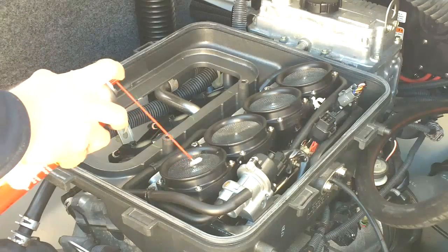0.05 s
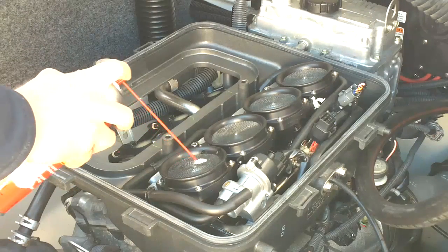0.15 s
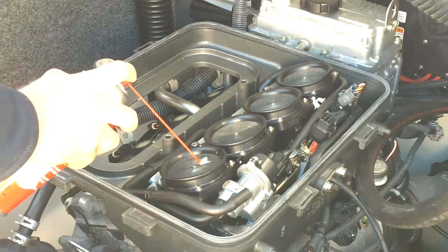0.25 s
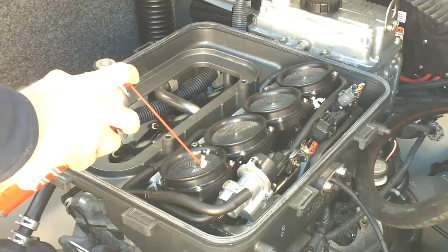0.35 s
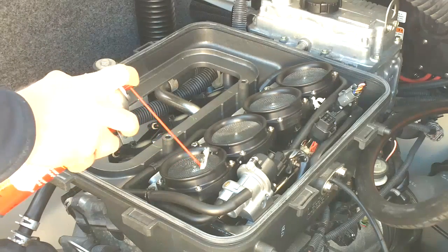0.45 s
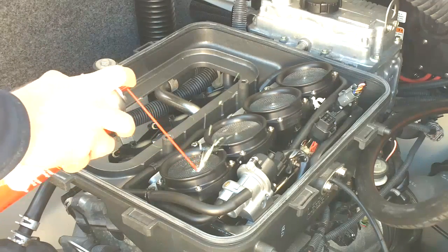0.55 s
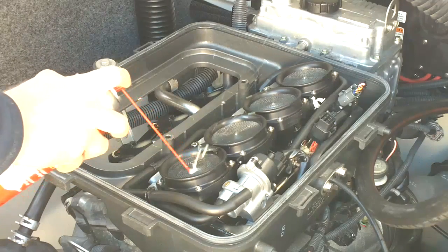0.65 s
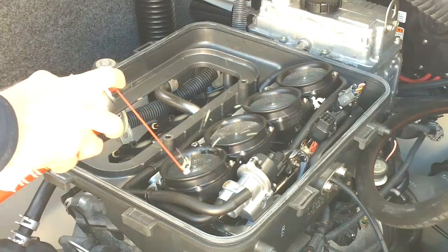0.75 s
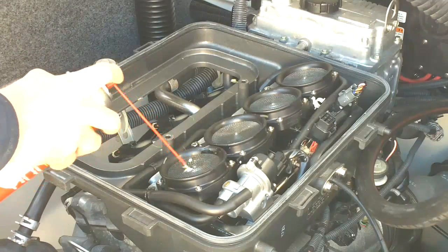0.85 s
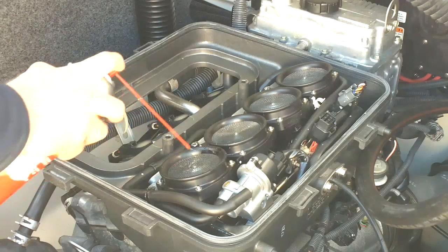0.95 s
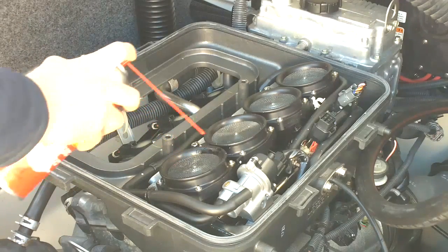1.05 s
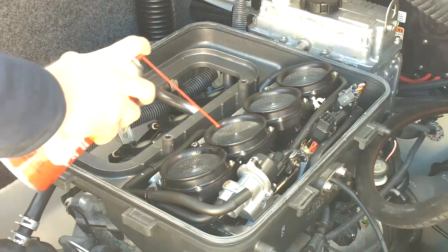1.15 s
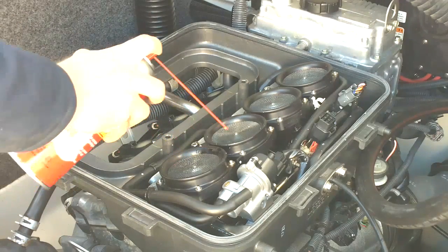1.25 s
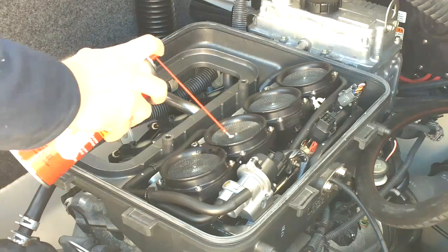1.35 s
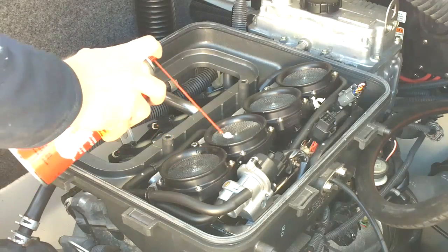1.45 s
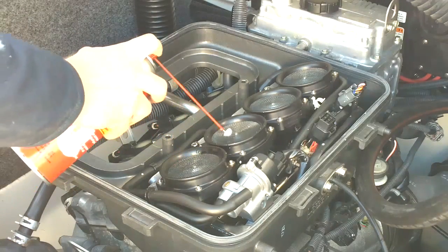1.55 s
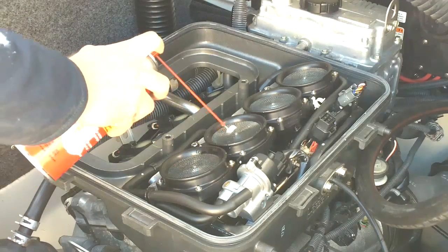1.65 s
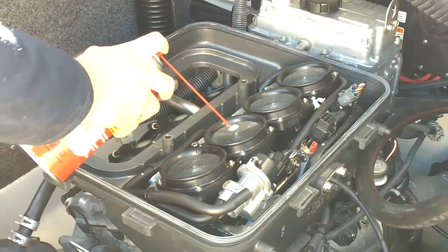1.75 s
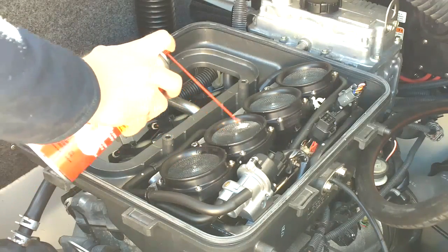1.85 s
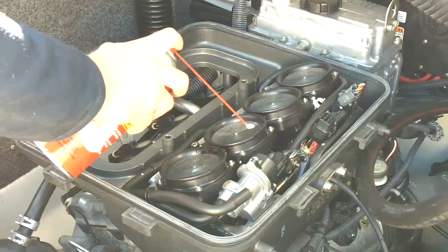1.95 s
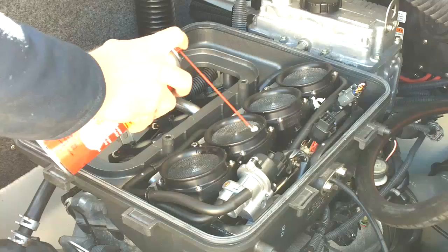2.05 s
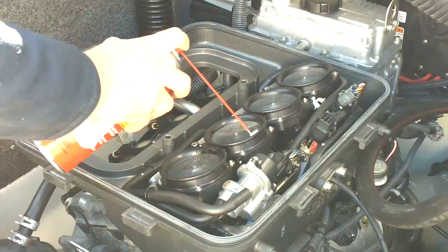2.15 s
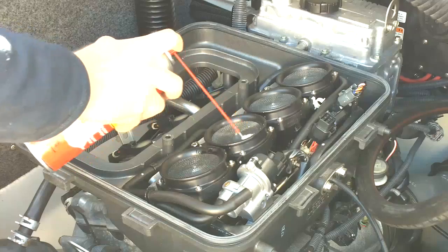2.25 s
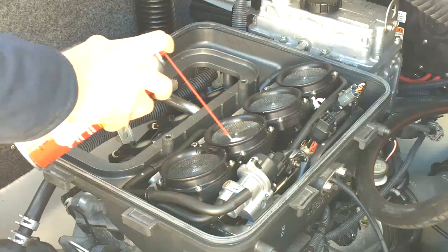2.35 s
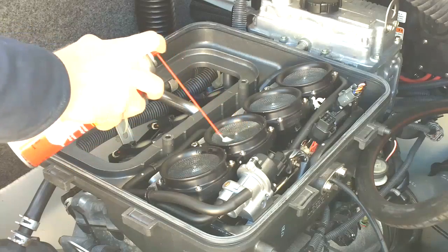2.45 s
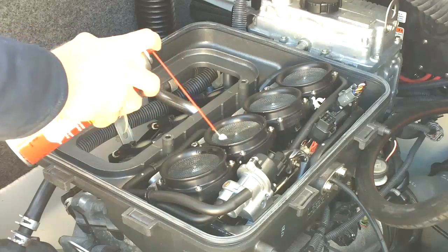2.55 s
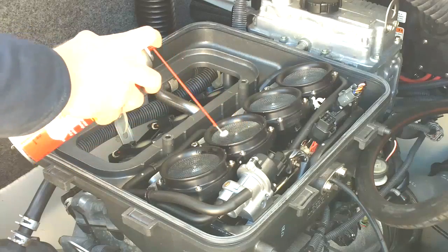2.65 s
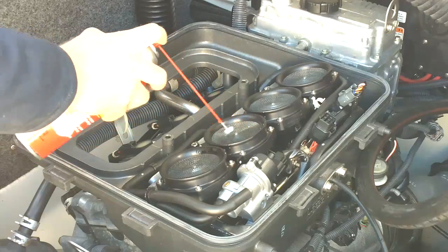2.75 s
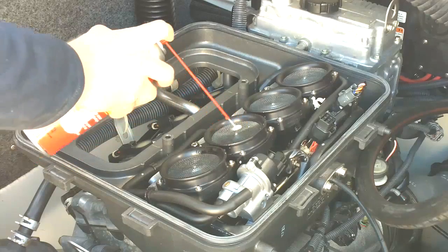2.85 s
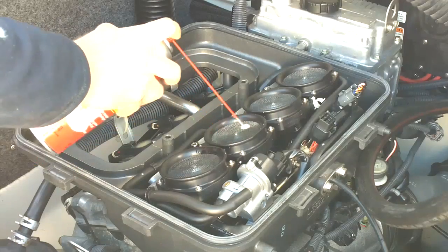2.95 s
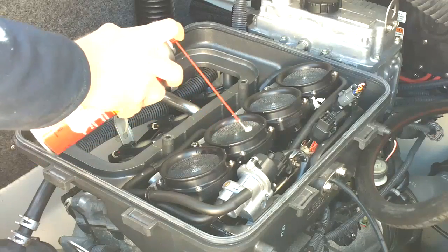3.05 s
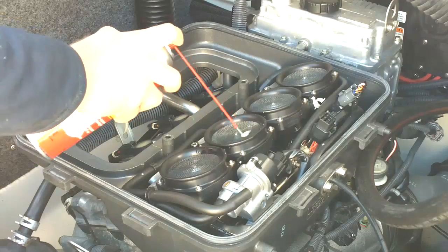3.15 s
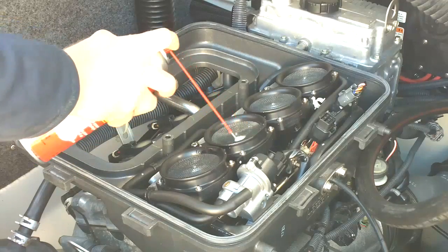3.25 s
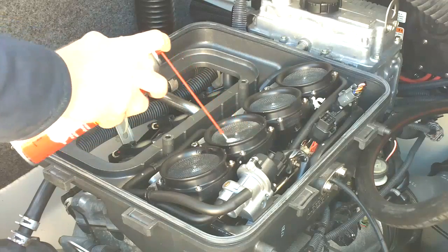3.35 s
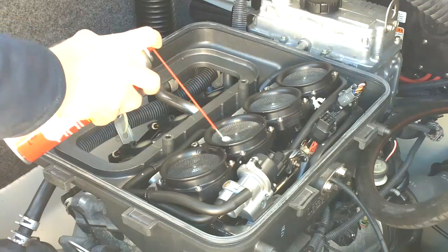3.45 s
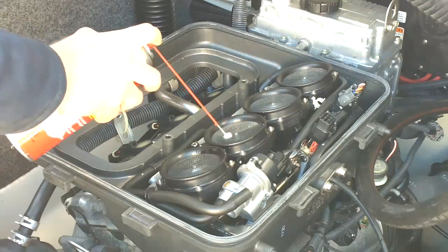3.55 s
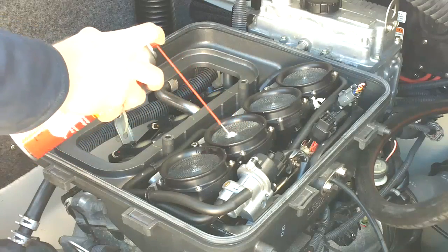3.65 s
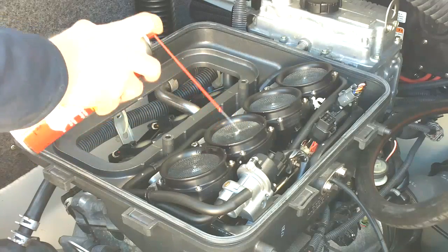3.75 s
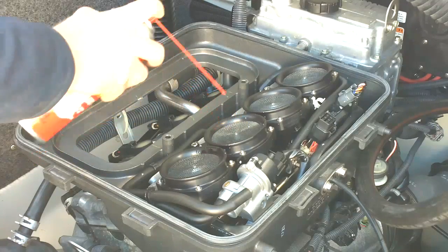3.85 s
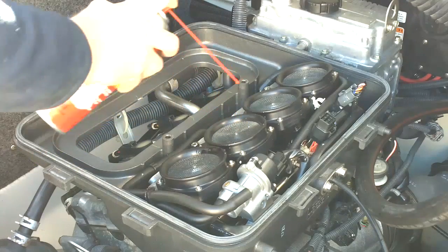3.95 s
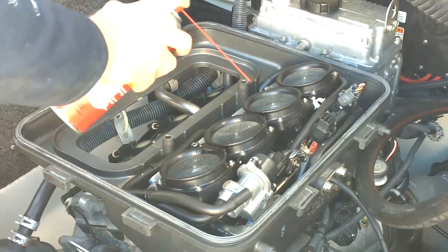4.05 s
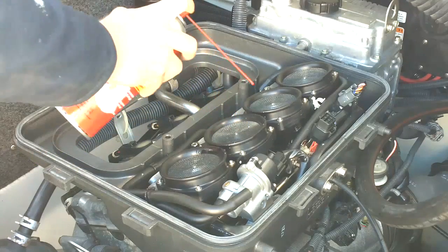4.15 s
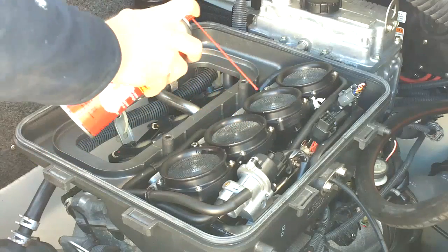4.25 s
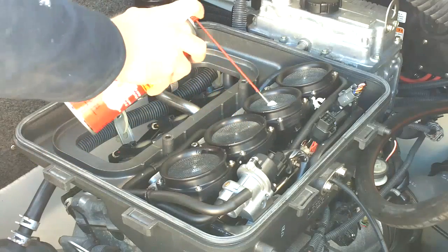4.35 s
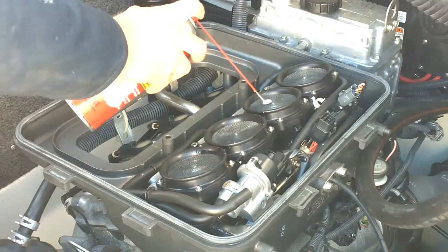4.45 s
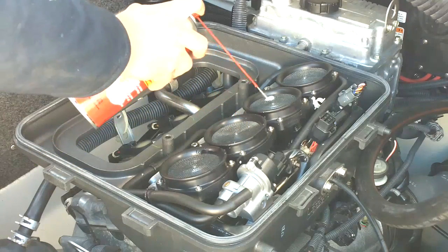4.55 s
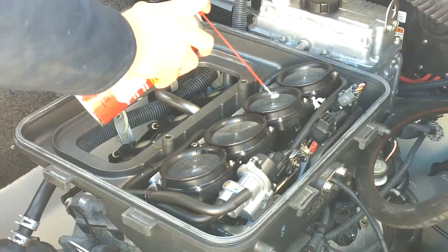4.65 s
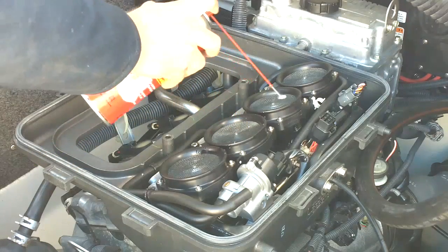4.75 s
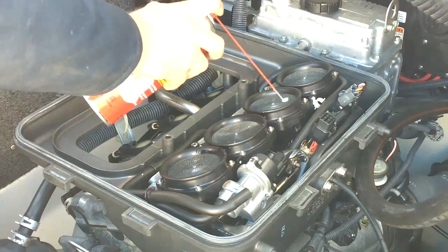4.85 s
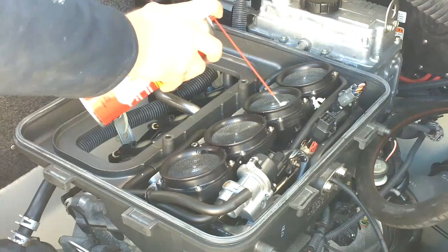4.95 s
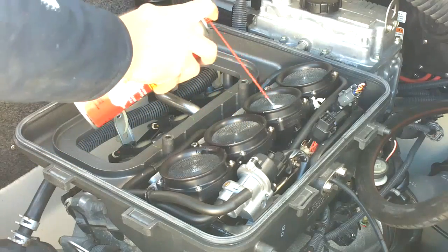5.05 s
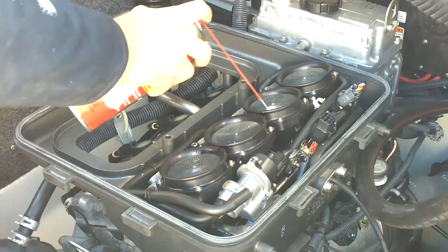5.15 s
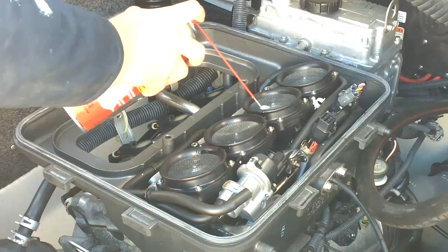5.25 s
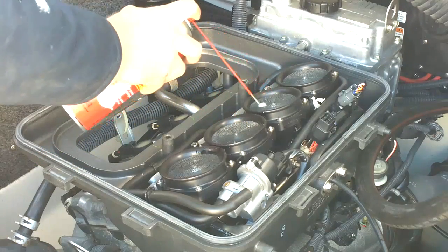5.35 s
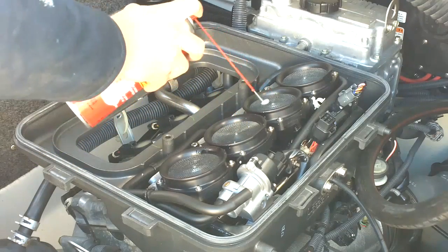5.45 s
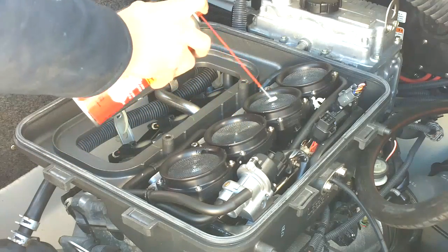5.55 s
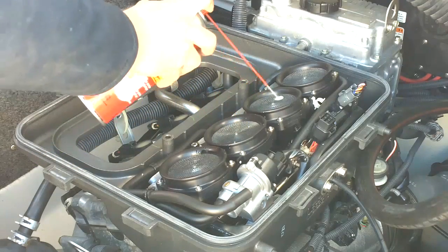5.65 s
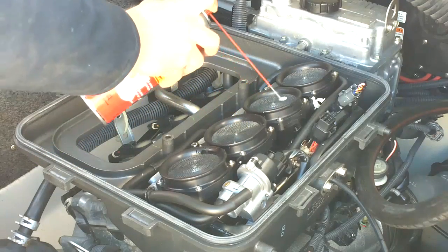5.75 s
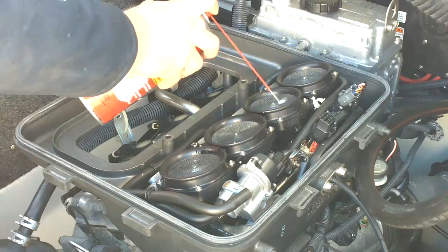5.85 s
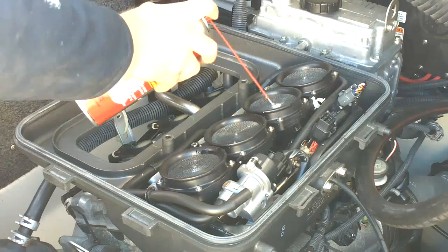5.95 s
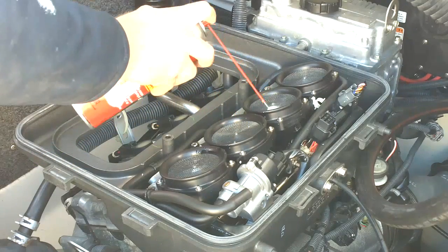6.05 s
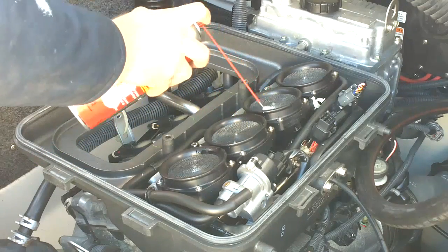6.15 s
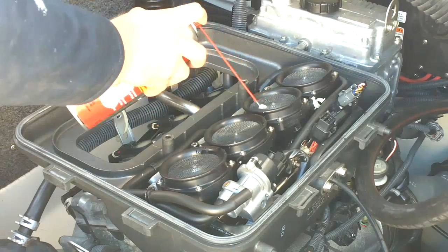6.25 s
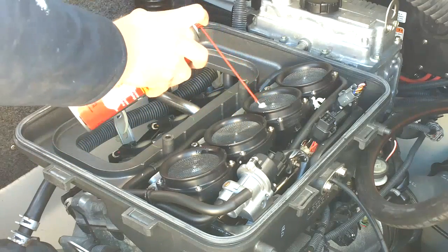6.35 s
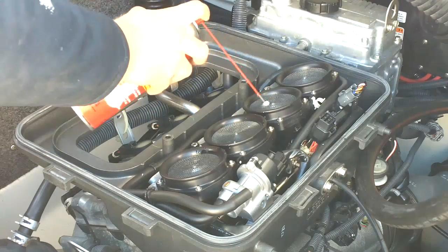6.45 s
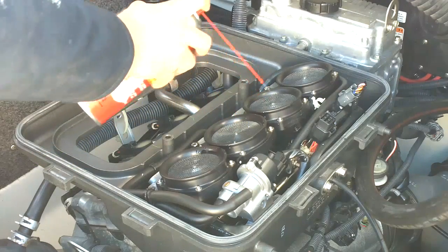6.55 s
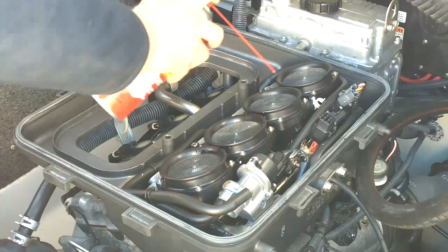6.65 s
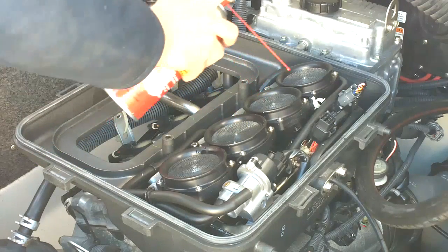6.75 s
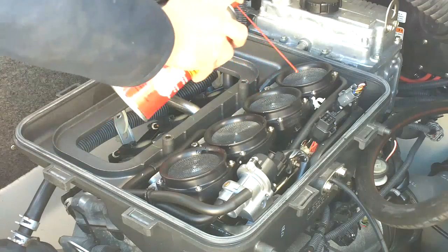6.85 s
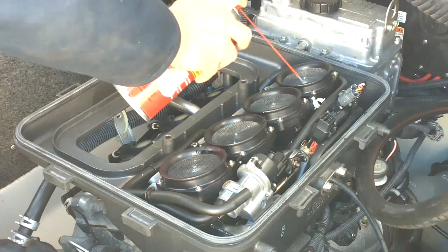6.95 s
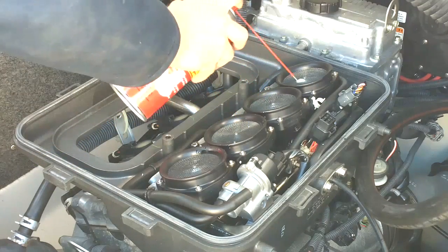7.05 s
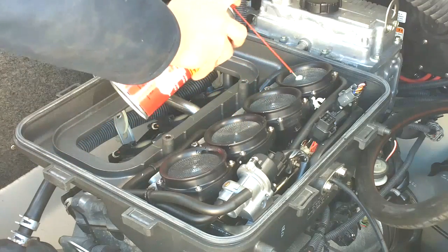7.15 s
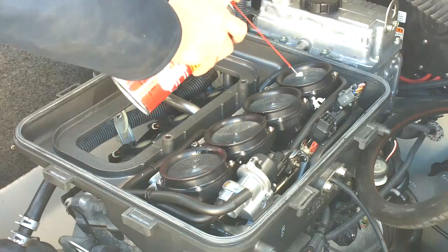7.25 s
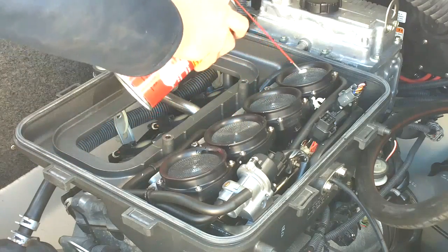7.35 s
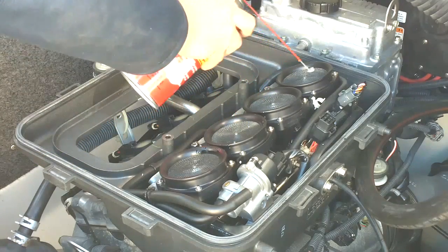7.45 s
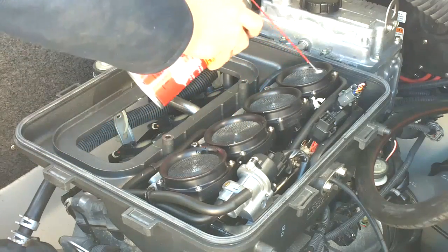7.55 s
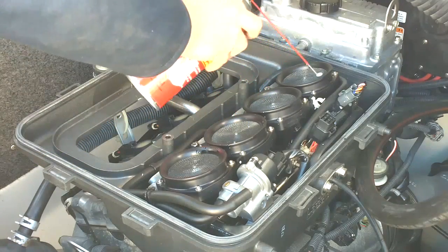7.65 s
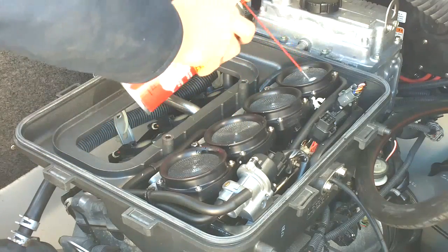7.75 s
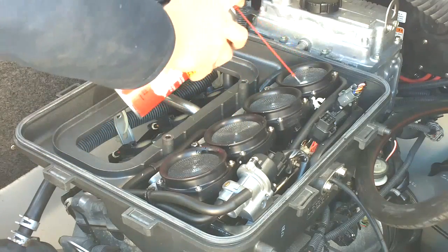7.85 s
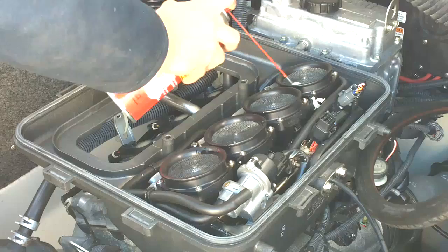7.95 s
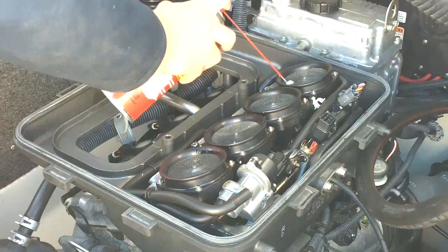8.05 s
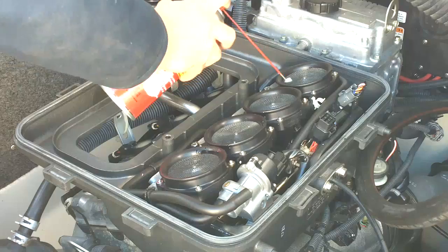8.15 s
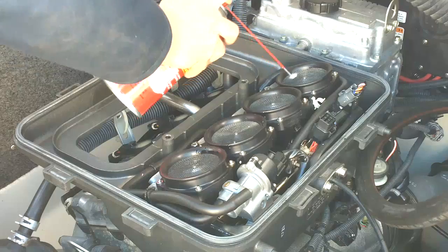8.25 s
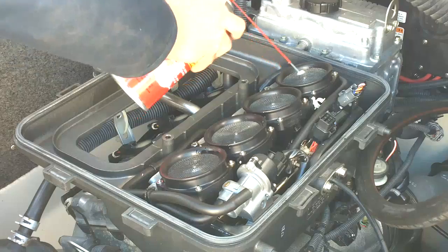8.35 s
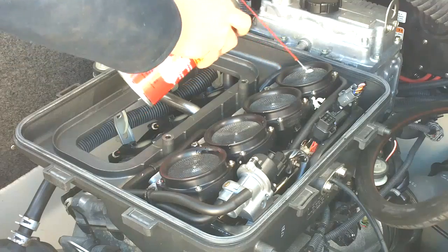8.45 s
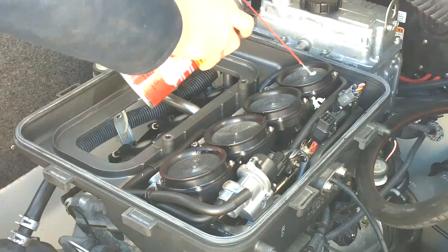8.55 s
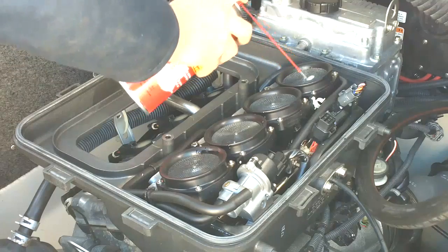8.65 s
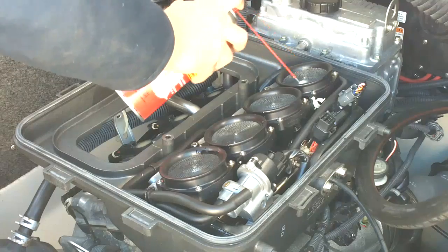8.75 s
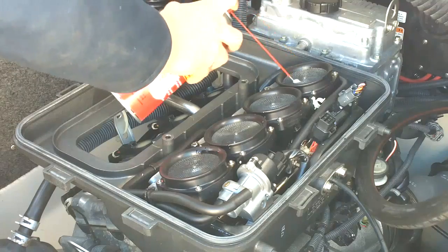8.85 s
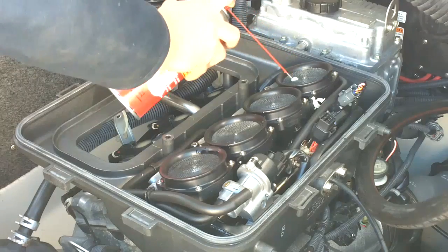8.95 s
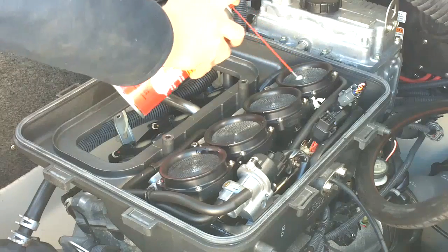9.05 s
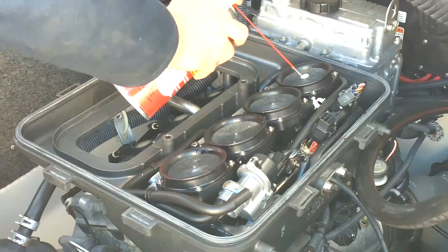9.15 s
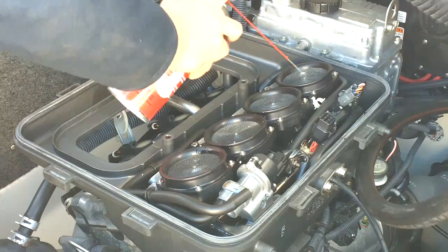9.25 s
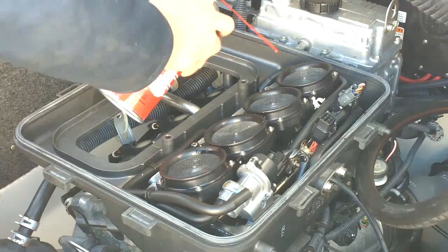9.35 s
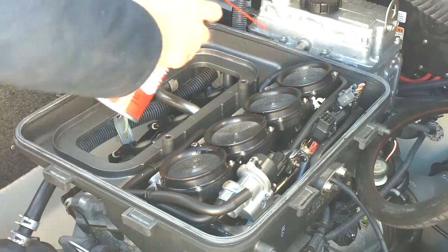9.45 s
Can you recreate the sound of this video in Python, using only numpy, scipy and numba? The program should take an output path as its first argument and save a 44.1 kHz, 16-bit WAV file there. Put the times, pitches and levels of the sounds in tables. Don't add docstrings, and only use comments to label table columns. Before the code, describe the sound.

In a quiet workshop, oil is sprayed through a straw into four engine bores in turn. Each spray starts with a sudden puff of gas, turns into splashy, grainy hiss with a shifting tubular resonance, then stops abruptly with a tiny leaking fizz. Soft dull taps and deep wind-like thumps intrude on the small, close microphone, its treble somewhat dulled.

```python
import sys
import numpy as np
from scipy import signal
from scipy.fft import rfft, irfft
from scipy.io import wavfile
from scipy.ndimage import uniform_filter1d
from numba import njit

SR = 44100
rng = np.random.default_rng(int(sys.argv[2]) if len(sys.argv) > 2 else 0)


def invert_db(level):
    return 10 ** (np.asarray(level, dtype=float) / 20)


def materialize(psi):
    bounded = np.clip(np.atleast_2d(psi).T, -1, 1)
    quanta = np.round(bounded * 32767).astype(np.int16)
    wavfile.write(sys.argv[1], SR, quanta)


N = 418950

# (frequency [Hz], density [dB per Hz])
AIR_SPECTRUM = [(150, 6), (300, 0), (550, -0.5), (1000, -7.5), (2000, -11.5), (3500, -14.5), (4800, -15),
                (5600, -9.5), (7000, -10.5), (10500, -17), (15000, -19.5)]
AIR_DB = -60

# (time [s], peak [dB], frequency [Hz], width [Hz], t60 [s])
KNOCKS = [(1.79, -44.5, 515, 200, 0.25), (1.85, -49, 550, 200, 0.21), (4.081, -55, 3550, 900, .15),
          (4.08, -56, 4500, 6000, .4), (6.74, -64, 700, 1500, .03), (6.781, -53.5, 600, 1380, 0.075),
          (7.39, -45, 560, 300, 0.05), (9.351, -48, 650, 600, 0.044)]

# (time [s], fade [s], slow heave [dB], rumble [dB])
GUSTS = [(0.42, .06, -50, -50.5), (1.56, .06, -43.5, -69), (1.75, 0.076, -53, -51), (2.7, 0.058, -51, -62),
         (4.13, 0.14, -34, -47), (4.47, 0.15, -59, -46), (4.6, 0.11, -32.5, -58),
         (4.76, 0.13, -32.5, -38.5), (5.16, 0.065, -31, -40), (5.48, 0.22, -42, -51),
         (6.0, 0.096, -41, -45), (6.27, 0.23, -40, -50), (6.46, 0.034, -43, -72),
         (6.96, 0.16, -38.5, -45.5), (7.06, 0.029, -33, -38), (7.7, 0.48, -44.5, -60),
         (7.86, 0.07, -26.5, -36), (8.02, 0.09, -28.5, -35), (8.33, 0.029, -17.5, -50),
         (8.37, 0.12, -28.5, -35), (8.71, 0.13, -38, -52), (8.91, 0.2, -41.5, -63), (9.28, .08, -45, -45.5)]
GUST_RISE_PER_FADE = 0.61
CALM_HEAVE_DB, CALM_RUMBLE_DB, CALM_SWING_DB = -58.5, -54, 3.0
LUMPS_DB, LUMPS_HZ = 2.5, 11.7
# (time [s], peak [dB], swing [Hz], flutter [dB])
PUFFS = [(4.211, -21.5, 65.7, -40), (4.462, -48, 152, -35), (4.521, -21, 162, -29), (4.568, -26, 96, -37),
         (4.588, -24, 188, -28.5), (4.61, -24, 51, -37), (4.695, -21.5, 58.6, -34), (4.765, -23, 95, -24.5),
         (4.795, -38, 120, -31.5), (4.897, -20, 74, -37), (4.944, -24, 80, -38), (6.219, -19, 78, -37),
         (6.274, -28.5, 156, -29.5), (6.786, -33, 64, -41), (6.924, -19.5, 68.4, -39),
         (6.948, -27, 48, -38), (7.057, -23.5, 107, -35), (7.391, -49, 108, -38), (7.86, -15.5, 72.6, -28),
         (7.949, -13, 186, -20.5), (8.002, -18.5, 108, -22), (8.044, -30, 99, -40),
         (8.321, -28, 146, -20.5), (8.35, -11, 44, -23), (8.368, -8.5, 80.5, -24), (8.443, -32, 111, -34.5),
         (8.476, -26.5, 153, -31.5), (8.694, -32, 28, -29), (8.72, -29, 40, -32), (8.771, -22, 103, -51)]

# (valve pressed [s], let go [s], nozzle hiss [dB], splash [dB], deep bore tone [dB])
SPRAYS = [
    (-0.3, 0.86, -44.5, -42, -48.5),
    (1.325, 3.74, -46, -40.5, -52.5),
    (4.25, 6.48, -45.5, -39.5, -49.5),
    (6.92, 9.27, -45.5, -40, -51),
]
# (time after press [s], hiss [dB], splash [dB], rings [dB])
OPENING = [
    (0.0, -55, -53, -50),
    (0.011, -36, -34, -42),
    (0.017, -9, -14.5, -46),
    (0.06, 0, -6.5, -19),
    (0.078, -2, 2.5, -1),
    (0.1, 0, 0, 0),
]
# (time after release [s], hiss [dB], splash [dB], rings [dB])
CLOSING = [
    (0.0, -0.5, 0, 0),
    (0.02, -2, -6.5, -14),
    (0.07, -4, -13.5, -24),
    (0.1, -15.5, -13, -58),
    (0.15, -19, -20.5, -37),
    (0.19, -31, -24, -36),
    (0.24, -48, -45, -50),
]
LEAK_PACE = 1.05, 0.95, 0.94, 0.82
# (frequency [Hz], density [dB per Hz])
NOZZLE_SPECTRUM = [(600, -13), (3000, -44), (7000, -5), (10000, -2.5), (11500, -3.5), (12000, -10.5),
                   (13500, -6.5), (15500, -9.5)]
# (frequency [Hz], density [dB per Hz])
SPLASH_SPECTRUM = [(500, -48), (750, -15.5), (1400, -13.5), (2500, -7), (3500, -5), (4900, -2.5), (5600, 1),
                   (6800, 1.5), (8500, -19), (11000, -34)]
# (frequency [Hz], width [Hz])
RIM = [
    (4720, 660),
    (6300, 1500),
]

# (frequency [Hz], width [Hz], level [dB])
BORE_1_RINGS = [(1480, 104, -9), (1950, 140, -3.5), (2245, 37, -1), (2760, 110, -6.5), (3050, 260, -3.5),
                (3550, 21, -10)]
BORE_2_RINGS = [(1500, 35, -17.5), (1640, 45, -14.5), (2145, 74, -4.5), (2752, 107, -9.5),
                (3160, 115, -8.5), (3434, 53, -10)]
BORE_3_RINGS = [(1210, 64, -23), (1340, 30, -12.5), (1774, 43, -14.5), (2025, 170, -12.5), (2593, 52, -6),
                (3170, 103, -5), (3743, 40, -6.5)]
BORE_4_RINGS = [(1493, 270, -17), (1830, 180, -21.5), (2150, 17, -38), (2247, 11, -5.5), (2615, 51, -6.5),
                (3364, 690, -7), (3860, 47, -14.5)]
BORES = BORE_1_RINGS, BORE_2_RINGS, BORE_3_RINGS, BORE_4_RINGS
# (fixed tone [Hz], its width [Hz], its level [dB], moving tone width [Hz])
DEEP_TONES = [(865, 35, 3, 70), (900, 60, -6, 120), (790, 90, -5, 110), (960, 200, -9, 110)]
# (frequency [Hz], ...)
LOW_MODES = [(800, 860), (770, 895, 1300), (767, 850, 934, 1092), (850, 960, 1075)]
LOW_MODE_WIDTH_HZ, LOW_MODE_DB, REACH_HZ = 33, 3.5, 348
# (time [s], ring [dB], deep tone [Hz], loudest ring [Hz], slant as lower-ring gain [dB])
JET_1 = [(0.0, -29.5, 853, 3170, -4), (0.24, -39, 857, 3050, -1), (0.3, -42.5, 855, 3020, 6),
         (0.5, -41, 850, 3160, 7), (0.86, -39, 845, 3160, 4.5)]
JET_2 = [(1.4, -43, 1097, 3400, 10.5), (1.72, -31.5, 1076, 3520, -1.5), (1.85, -35.5, 1000, 3400, 4),
         (2.12, -33.5, 945, 3390, 4.5), (2.4, -31, 896, 3170, 2.5), (2.6, -28.5, 894, 3170, -6.5),
         (2.94, -30.5, 880, 3140, 0), (3.34, -31.5, 860, 3120, -0.5), (3.74, -36, 833, 3220, 7)]
JET_3 = [(4.33, -41.5, 1130, 3300, 4.5), (4.59, -25.5, 950, 3720, -9.5), (4.8, -34.5, 930, 3430, 4.5),
         (5.08, -31.5, 900, 3280, 0), (5.4, -32.5, 915, 3325, -2), (5.68, -34.5, 897, 3110, 1),
         (5.9, -39, 814, 3010, 9), (6.1, -33, 906, 3120, 3), (6.48, -40, 850, 2970, 7)]
JET_4 = [(7.0, -39.5, 1100, 3520, 9), (7.33, -28, 1090, 3440, -9.5), (7.62, -35.5, 855, 3280, 8),
         (7.88, -34, 910, 3200, 4), (8.18, -28.5, 1010, 3210, -6), (8.6, -37.5, 810, 3230, 8.5),
         (8.79, -38.5, 930, 3150, 11), (8.97, -32.5, 864, 3200, 0.5), (9.27, -38, 820, 3190, 5)]
JETS = JET_1, JET_2, JET_3, JET_4
# (time [s], width [s], gain [dB])
CROSSINGS = [(0.62, 0.51, 4.5), (1.46, 0.24, 5.5), (3.62, 0.14, 6), (5.88, 0.082, 6), (6.3, 0.45, -7),
             (7.1, 0.2, 4), (7.7, 0.13, 1), (8.2, 0.13, 2.5), (9.0, 0.18, -0.5)]

USUAL_RING_DB, RING_WANDER_DB = -34, 1.3
HISS_FOLLOWS, SPLASH_FOLLOWS = 0.18, 0.32
DEEP_PER_SLANT, RIM_PER_SLANT, OUTER_PER_SLANT = 0.13, -1.56, 0.7
RIM_DB, OUTER_RIM_DB, RIM_TOP_DB = -6.5, -5.5, 4
FLARE_HZ, FLARE_WIDTH_HZ, FLARE_DB = 5640, 1200, -1
MIDDLE_HZ, MIDDLE_PER_DEEP = 2273, 1.6
FALTER_S, FALTER_WIDTH_S, FALTER_DB = 8.71, 0.03, -10

NOTCH_HZ = 4199, 7855, 8796, 12605
# (width [Hz], depth [0-1])
NOTCHES = [(530, 1), (2750, 1), (1200, 0.93), (1200, .98)]
SHELF_HZ, TOP_HZ = 5010, 15290


def rms_one(x):
    return x / np.sqrt(np.mean(x ** 2) + 1e-20)


def in_time(rows):
    s, *columns = np.transpose(rows)
    return [np.interp(np.arange(N) / SR, s, c) for c in columns]


def bump(centre_s, width_s):
    return np.exp(-((np.arange(N) / SR - centre_s) / width_s) ** 2)


def coloured(spectrum):
    hz, db = np.transpose(spectrum)
    grid_hz = np.arange(1, N // 2 + 2) * SR / N
    gain = invert_db(np.interp(np.log(grid_hz), np.log(hz), db))
    return rms_one(irfft(rfft(rng.standard_normal(N)) * gain, N))


def band(low_hz, high_hz):
    sos = signal.butter(3, [low_hz, high_hz], "band", fs=SR, output="sos")
    return rms_one(signal.sosfilt(sos, rng.standard_normal(N)))


def drift(rate_hz):
    r = np.exp(-80 * np.pi * rate_hz / SR)
    slow = signal.lfilter([1], [1, -2 * r, r * r], rng.standard_normal(N // 40 + 2002))[2000:]
    return np.interp(np.arange(N) / 40, np.arange(len(slow)), rms_one(slow))


@njit
def resonate(x, cosine, r):
    y = np.zeros(len(x))
    for i in range(2, len(x)):
        drive = (1 - r * r) / 2 * (x[i] - x[i - 2])
        y[i] = drive + 2 * r * cosine[i] * y[i - 1] - r * r * y[i - 2]
    return y


def ringing(x, hz, width_hz):
    cosine = np.cos(2 * np.pi * hz / SR) * np.ones(len(x))
    r = np.exp(-np.pi * width_hz / SR)
    return resonate(resonate(x, cosine, r), cosine, r)


def shop_air():
    return invert_db(AIR_DB) * coloured(AIR_SPECTRUM)


def knocks():
    out, t = np.zeros(N), np.arange(SR // 5) / SR
    for s, db, hz, width_hz, t60_s in KNOCKS:
        at = round(s * SR)
        burst = rms_one(ringing(rng.standard_normal(len(t)), hz, width_hz))
        out[at:at + len(t)] += (invert_db(db - 60 * t / t60_s) * burst)[:N - at]
    return out


def gusts():
    t = np.arange(0, N, 64) / SR
    calm = invert_db(CALM_SWING_DB * drift(5.0)[::64])
    s, fade_s, heave_db, rumble_db = np.transpose(GUSTS)[:, :, None]
    slope_s = np.maximum(fade_s * np.where(t < s, GUST_RISE_PER_FADE, 1), 0.01)
    shape = np.exp(-2 * np.abs(t - s) / slope_s)
    heave = (invert_db(CALM_HEAVE_DB) * calm) ** 2 + (invert_db(2 * heave_db) * shape).sum(axis=0)
    rumble = invert_db(2 * CALM_RUMBLE_DB) + (invert_db(2 * rumble_db) * shape).sum(axis=0)
    return [np.interp(np.arange(N) / SR, t, np.sqrt(power)) for power in (heave, rumble)]


def puffs():
    out, t = np.zeros(N), np.arange(-SR // 20, SR // 20) / SR
    dull, bright = band(68.0, 219.0), band(220.0, 510.0)
    for s, db, hz, flutter_db in PUFFS:
        at = round(s * SR) + np.arange(len(t)) - SR // 20
        turn = (np.pi * hz * t) ** 2
        out[at] -= invert_db(db - 5.5) * (1 - 2 * turn) * np.exp(-turn)
        bright_db = 1.12 * (flutter_db + 20.5) - 7.5
        flutter = dull[at] + invert_db(bright_db) * bright[at]
        out[at] += invert_db(flutter_db - 7.0) * flutter * np.exp(-(t / 0.011) ** 2)
    return out


def buffeting():
    heave_gain, rumble_gain = gusts()
    heave = band(11.0, 35.0)
    heave /= np.sqrt(uniform_filter1d(heave ** 2, size=2600) + 0.11)
    rumble = invert_db(LUMPS_DB * drift(LUMPS_HZ)) * band(37.2, 120.0)
    out = heave_gain * rms_one(heave) + rumble_gain * rumble + puffs()
    return 0.3 * np.tanh(out / 0.3)


def reflections(x, first_db, fall_db_per_ms, sway_ms):
    out, now = x.copy(), np.arange(N)
    for ms in np.sort(rng.uniform(1, 13, 14)):
        lag = (ms + sway_ms * drift(0.65)) * SR / 1000
        gain = rng.choice([-1, 1]) * invert_db(first_db - fall_db_per_ms * ms)
        out += gain * np.interp(now - lag, now, x)
    return rms_one(out) * np.std(x)


def valve(pressed_s, let_go_s, pace):
    opening = in_time([(pressed_s + s, *db) for s, *db in OPENING])
    closing = in_time([(let_go_s + pace * s, *db) for s, *db in CLOSING])
    return np.add(opening, closing)


def rim_splash(white, slant_db):
    inner_db = np.minimum(RIM_DB + RIM_PER_SLANT * slant_db, RIM_TOP_DB)
    outer_db = OUTER_RIM_DB + OUTER_PER_SLANT * slant_db
    out = invert_db(inner_db + FLARE_DB) * rms_one(ringing(white[0], FLARE_HZ, FLARE_WIDTH_HZ))
    for (hz, width_hz), db in zip(RIM, (inner_db, outer_db)):
        out += invert_db(db) * rms_one(ringing(white[1], hz, width_hz))
    return out


def bore_rings(white, bore, strength, deep_hz, top_hz, slant_db):
    middle_hz = MIDDLE_HZ + MIDDLE_PER_DEEP * (deep_hz - 900)
    out = invert_db(-4.5) * ringing(white[1], top_hz, 310.0)
    out += invert_db(slant_db - 10) * ringing(white[0], middle_hz, 360.0)
    for k, (hz, width_hz, db) in enumerate(bore):
        gain_db = db + slant_db * (hz < 2900) + RING_WANDER_DB * strength[k]
        out += invert_db(gain_db) * ringing(white[k % 2], hz, 1.66 * width_hz + 40)
    return rms_one(out)


def deep_tone(white, tones, modes_hz, deep_hz, narrow):
    low_hz, low_width_hz, low_db, deep_width_hz = tones
    out = ringing(white[0], deep_hz, deep_width_hz)
    out += invert_db(low_db) * ringing(white[1], low_hz, 2 * low_width_hz)
    blown = ringing(white[1], deep_hz, REACH_HZ)
    for hz in modes_hz:
        out += invert_db(LOW_MODE_DB) * ringing(blown, hz, LOW_MODE_WIDTH_HZ)
    return rms_one(signal.sosfilt(narrow, out))


def spray():
    sputter = invert_db(0.29 * drift(18.0) + 1.0 * drift(68))
    nozzle, splash = coloured(NOZZLE_SPECTRUM), coloured(SPLASH_SPECTRUM)
    blowing = band(503.0, 672.0)
    strength = np.array([drift(4.3) for k in range(8)])
    narrow = signal.cheby1(6, 1, 730.0, "high", fs=SR, output="sos")
    noise = rng.standard_normal((2, N))
    falter_db = FALTER_DB * bump(FALTER_S, FALTER_WIDTH_S)
    crossing_db = sum(db * bump(s, width_s) for s, width_s, db in CROSSINGS)
    out, low = np.zeros(N), np.zeros(N)
    for press, pace, jet, modes_hz, bore, tones in zip(SPRAYS, LEAK_PACE, JETS, LOW_MODES, BORES, DEEP_TONES):
        pressed_s, let_go_s, nozzle_db, oil_level_db, deep_level_db = press
        start = max(round(pressed_s * SR), 0)
        stop = min(round((let_go_s + pace * CLOSING[-1][0]) * SR), N)
        span = slice(start, stop)
        white, fail_db = noise[:, span], falter_db[span]
        gas_db, oil_db, air_db = valve(pressed_s, let_go_s, pace)[:, span]
        jet_db, deep_hz, top_hz, slant_db = (c[span] for c in in_time(jet))

        swing_db = jet_db - USUAL_RING_DB
        hiss_db = nozzle_db + gas_db + HISS_FOLLOWS * swing_db
        splash_db = oil_level_db + oil_db + SPLASH_FOLLOWS * (swing_db + fail_db)
        ring_db = jet_db + air_db + fail_db
        deep_db = deep_level_db + air_db + DEEP_PER_SLANT * slant_db + fail_db + crossing_db[span]

        rings = bore_rings(white, bore, strength[:, span], deep_hz, top_hz, slant_db)
        deep = deep_tone(white, tones, modes_hz, deep_hz, narrow)
        out[span] = invert_db(hiss_db + 11.5) * nozzle[span] + invert_db(splash_db + 5.0) * splash[span]
        out[span] += invert_db(splash_db) * rim_splash(white, slant_db)
        out[span] += invert_db(ring_db - 5) * rings
        low[span] = invert_db(deep_db - 2.0) * deep + invert_db(deep_db - 18.0) * blowing[span]
        low[span] += invert_db(ring_db - 5.5) * rings
    out = signal.sosfilt(narrow, out * sputter)
    return low * sputter + reflections(out, first_db=-6.0, fall_db_per_ms=0.8, sway_ms=0.11)


def scene():
    return (shop_air() + knocks() + buffeting() + spray())[None]


def roll_off(x):
    return signal.sosfilt(signal.butter(12, 15340, fs=SR, output="sos"), x)


def record(dry):
    for hz, (width_hz, depth) in zip(NOTCH_HZ, NOTCHES):
        r, turn = np.exp(-np.pi * width_hz / SR), np.cos(2 * np.pi * hz / SR)
        peak = signal.lfilter([(1 - r * r) / 2, 0, (r * r - 1) / 2], [1, -(1 + r * r) * turn, r * r], dry)
        dry = dry - np.clip(depth, 0, 1) * peak
    hz = np.arange(N // 2 + 1) * SR / N
    shelf = invert_db(-3.0 * (0.5 + np.tanh((hz - SHELF_HZ) / 50.0)))
    mix = irfft(rfft(dry) * shelf * (hz < TOP_HZ), N)
    return roll_off(mix)


dry = scene()
out = record(dry)
materialize(out)
```